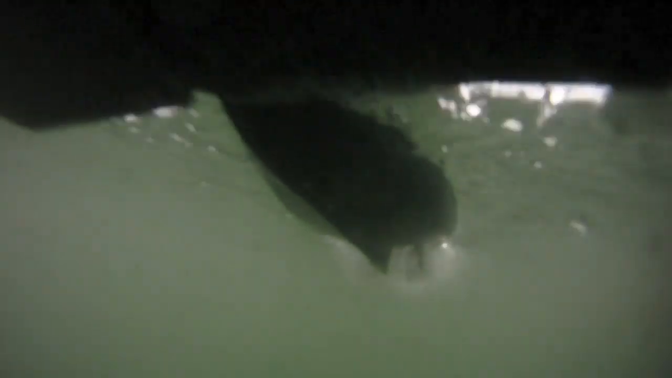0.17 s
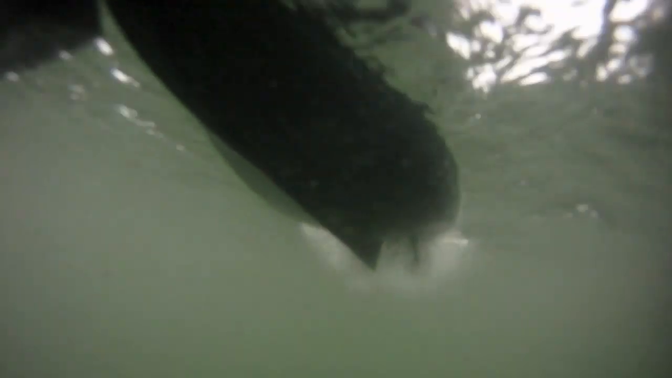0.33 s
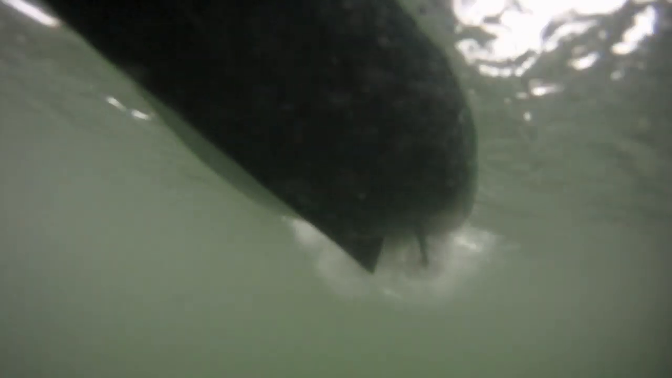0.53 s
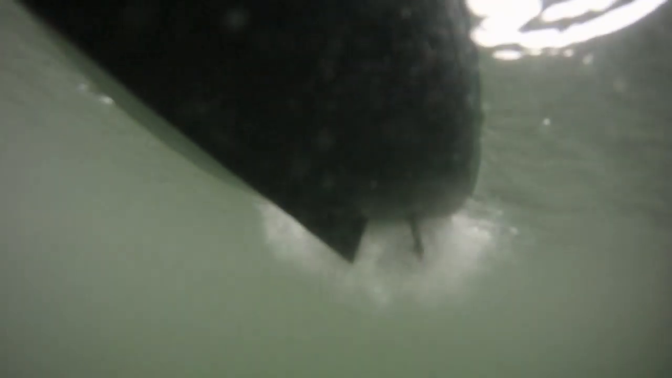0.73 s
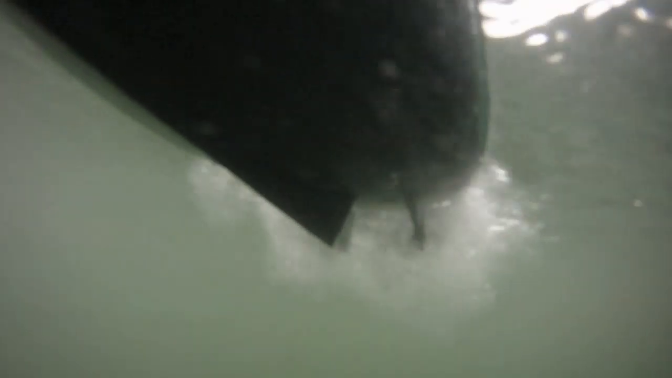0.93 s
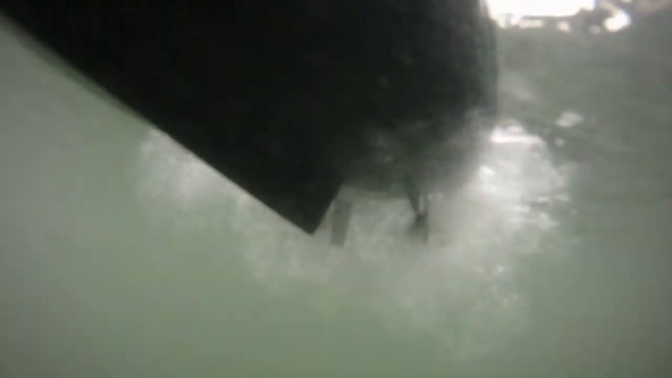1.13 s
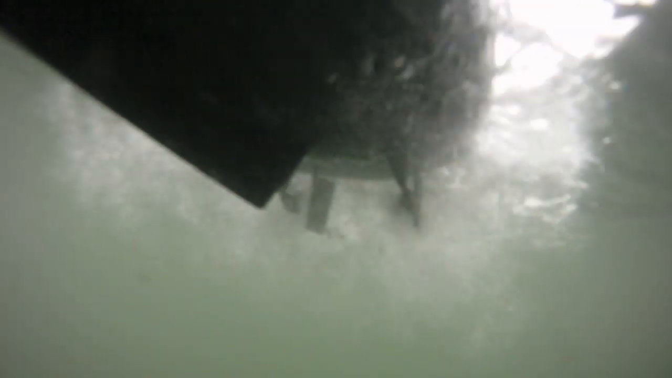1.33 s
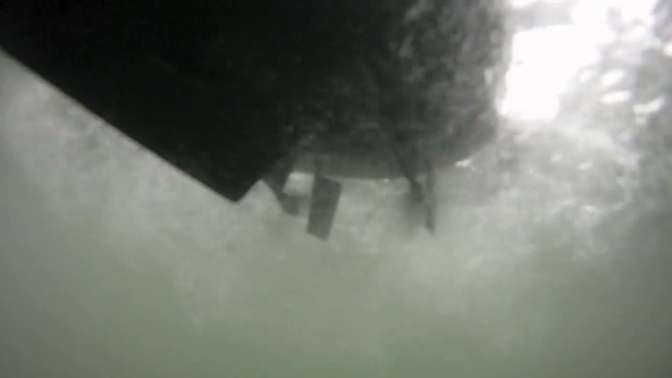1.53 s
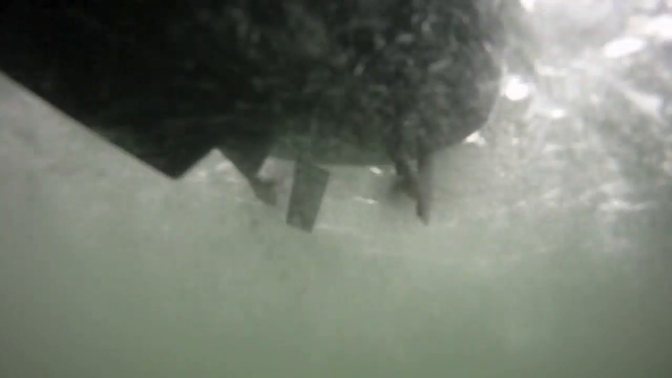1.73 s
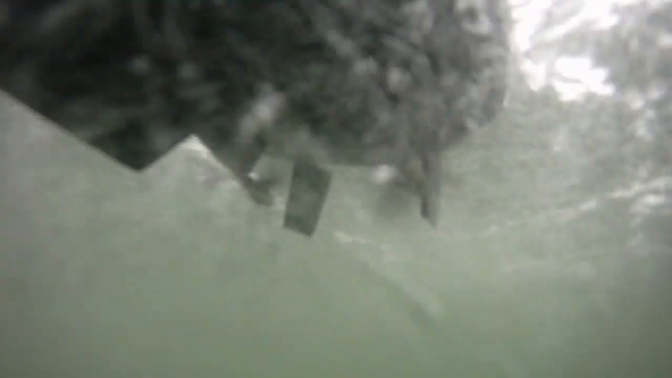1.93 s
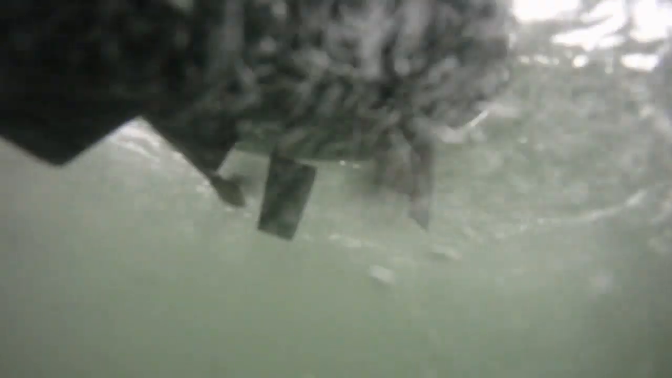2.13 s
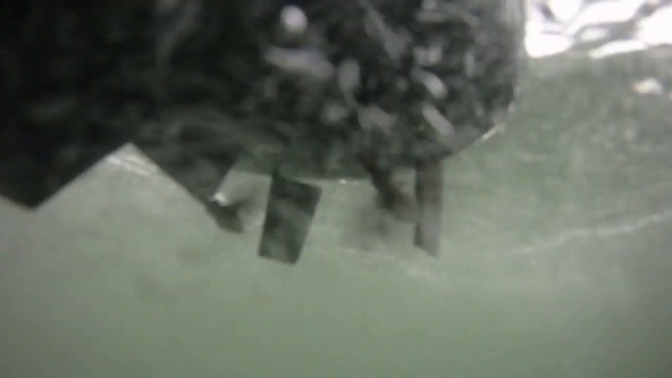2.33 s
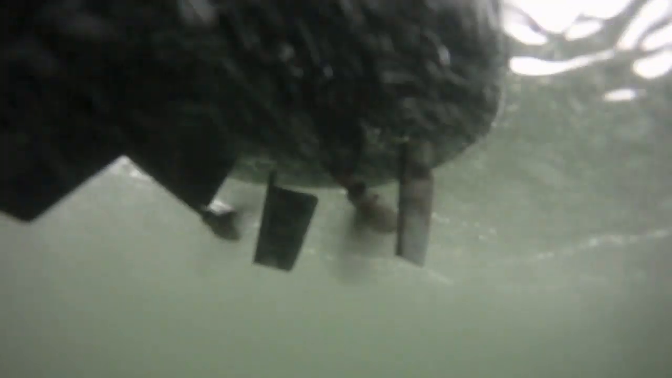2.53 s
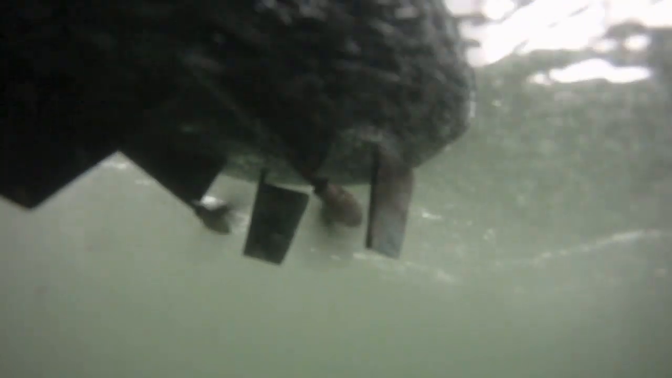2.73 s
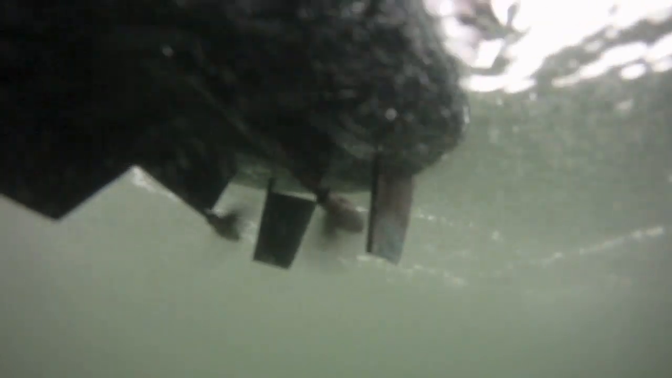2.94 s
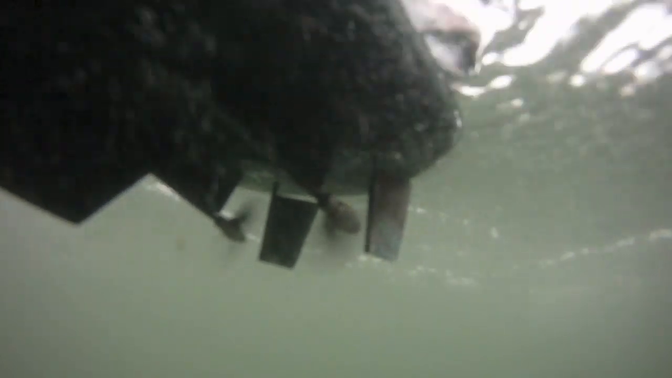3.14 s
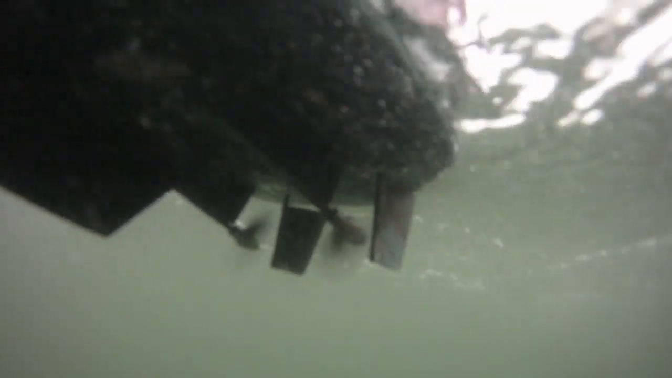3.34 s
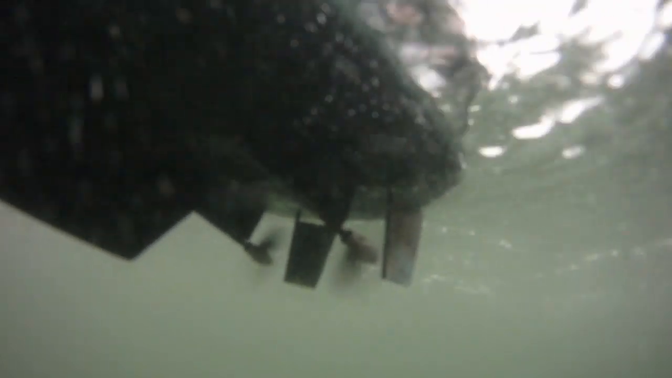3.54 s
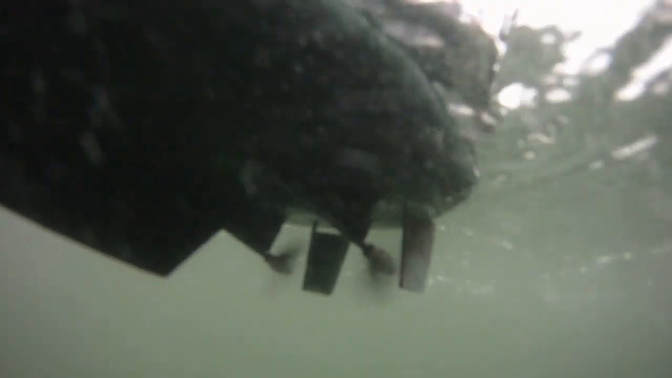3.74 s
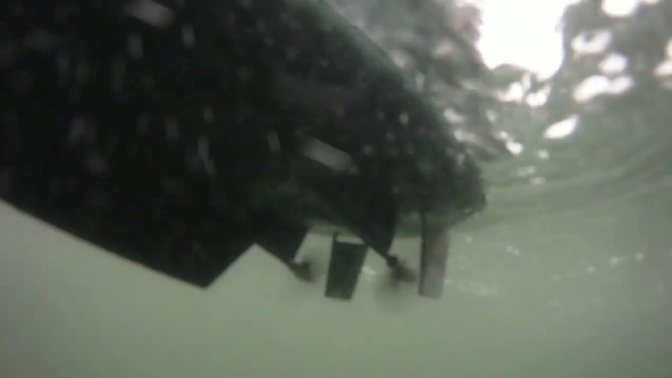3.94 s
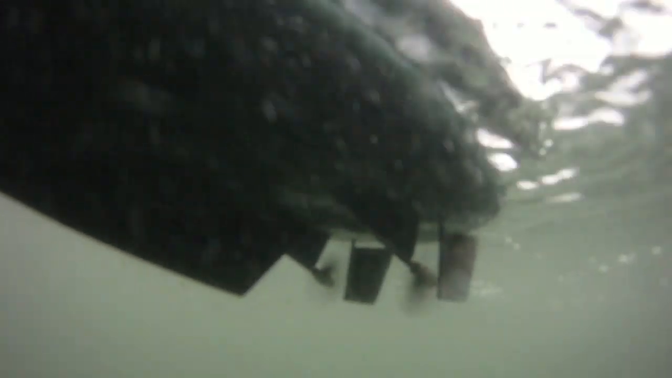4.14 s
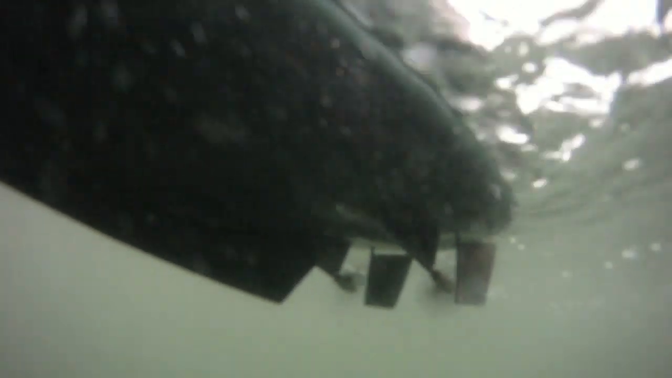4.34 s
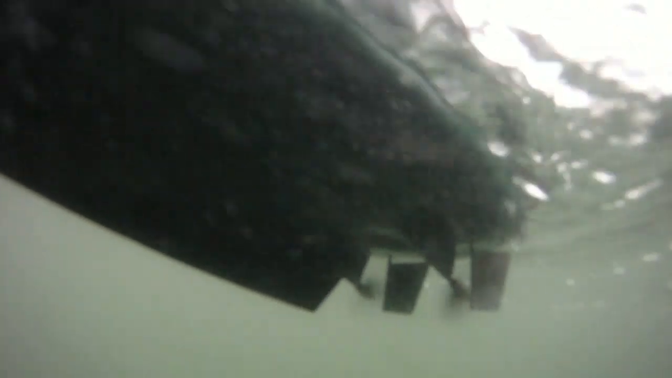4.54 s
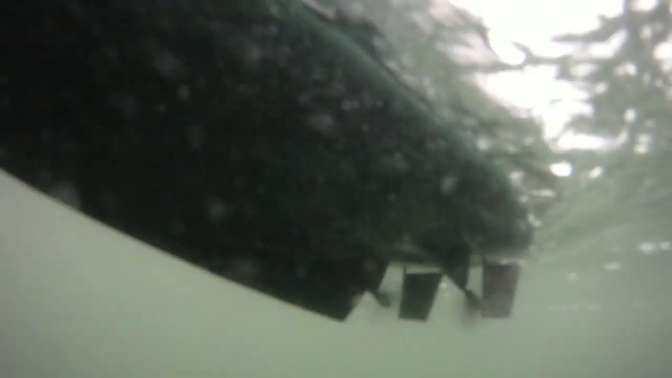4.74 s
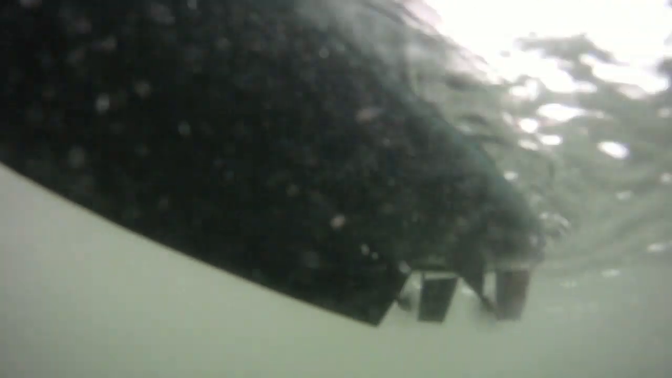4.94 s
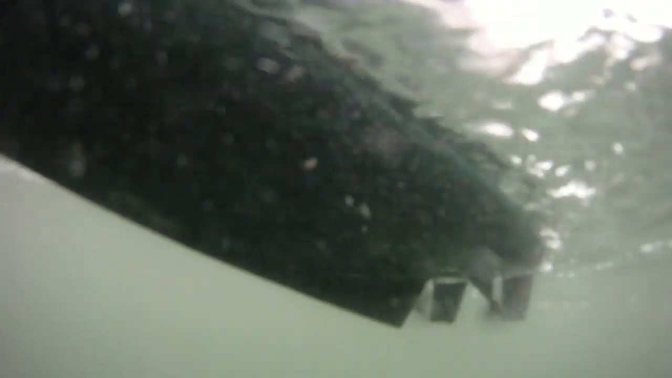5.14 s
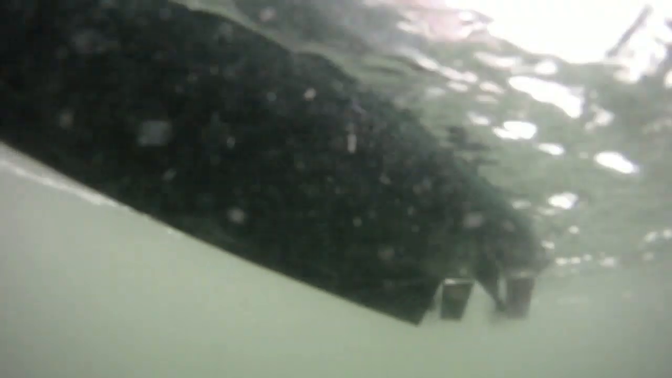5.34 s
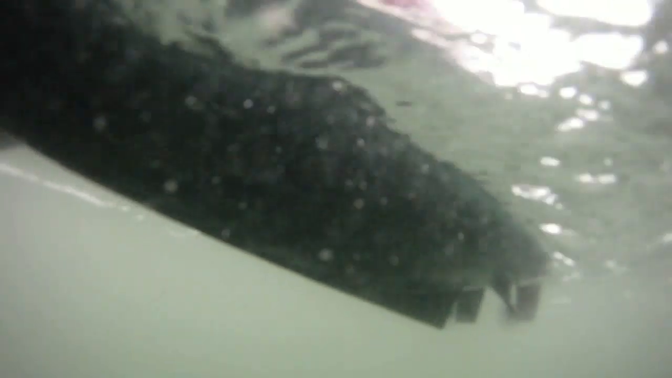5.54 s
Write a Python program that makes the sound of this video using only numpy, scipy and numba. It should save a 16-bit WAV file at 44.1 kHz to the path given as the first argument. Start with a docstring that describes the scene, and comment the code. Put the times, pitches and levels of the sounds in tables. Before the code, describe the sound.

Heard through a cheap submerged camera, a model boat's two propeller shafts purr at about twenty-eight pulses a second. A low hull throb grows first, then a raspy metallic chatter around two kilohertz surges as the stern passes, with tiny chirps, gear whine, bubbling foam and fizzing spray. It drops away quickly, leaving fluttering thump, faint whine and soft churning water.

```python
"""Under water, by a submerged camera: a twin-screw model boat runs past, comes close and draws away.
The port shaft thumps the hull and its gear whines once a turn. The starboard shaft, at a slightly different
speed, rubs and taps, once a turn at first and then twice, and chirps at each hard catch.
Shaped noise and ringing clicks make the churn, bubbles, foam and spray; a motor whine and hull hum lie beneath.
The camera's coarse sampling mirrors it all into a metallic treble."""
import sys
import numpy as np
from scipy import signal
from scipy.fft import rfft, irfft
from scipy.io import wavfile
from numba import njit

SR = 44100
rng = np.random.default_rng(int(sys.argv[2]) if len(sys.argv) > 2 else 0)


def store_wav(level_fs):
    """Save 16-bit WAV to argv[1]."""
    pcm = np.round(np.clip(np.atleast_2d(level_fs), -1, 1) * 32767)
    wavfile.write(sys.argv[1], SR, pcm.T.astype(np.int16))


N = 250488
TIME = np.arange(N) / SR  # seconds

# In every swell or rise below, the half width is the time from the peak down to 1/e.
# The pass of the stern. Each row: time in seconds, loudness of the shafts in dB (only its swing is used).
PASS = [(0.0, -48.5), (0.4, -37.5), (0.55, -38.5), (0.75, -31.5), (1.28, -27), (1.45, -19), (1.75, -10),
        (2.55, -10.5), (2.85, -19), (3.75, -35), (4.5, -36), (5.05, -43), (5.68, -45.5)]
# Shaft speeds. Each row: time in seconds, port turns per second, starboard turns per second.
SHAFTS = [(0.0, 28.32, 28.44), (0.6, 28.47, 28.36), (1.0, 27.91, 27.79), (1.4, 27.69, 28.25),
          (1.8, 27.07, 28.17), (2.3, 26.62, 28.12), (2.8, 26.87, 28.13), (3.3, 26.93, 27.9),
          (3.8, 26.97, 28.18), (4.3, 27.11, 28.18), (4.8, 26.69, 27.85), (5.68, 26.96, 28.13)]
# Sharp modes of the shaft tube. Each row: pitch in Hz, width in Hz, level in dB against the rubbing when closest.
TUBE = [(2180, 9.6, -2.5), (2304, 12, -8)]
# Hard catches of the starboard shaft. Each row: time in seconds, peak in dB, pitch in Hz.
CHIRPS = [(1.422, -15.5, 2220), (1.475, -11, 2150), (1.667, -7, 2200), (1.723, -8, 2200), (1.776, -9, 2340),
          (1.812, -5, 2360), (1.903, -8, 2350), (1.937, -4, 2360), (1.968, -5.5, 2320), (2.057, -5.5, 2170),
          (2.094, -9.5, 2220), (2.254, -7, 2290), (2.343, -7, 2200), (2.378, -7.5, 2320), (2.467, -7, 2160),
          (2.649, -12, 2200)]
# The gear's third and fourth partials, which come with load: relative levels in dB.
OVERTONES_DB = [-1.5, -16.5]
# Spells of load on the gear teeth. Each row: start in seconds, end in seconds, rise of the overtones in dB.
LOAD_SPELLS = [(0.353, 1.148, 7), (2.005, 3.312, 11), (2.334, 2.406, 5.5), (2.588, 2.662, 8)]
# The gear swells as the stern swings. Each row: time in seconds, half width in seconds, rise in dB.
GEAR_RISES = [(1.75, 0.076, 3), (5.64, 0.054, 7.5)]
# The port shaft's thump. Each row: time in seconds, level in dB before the trim in scene().
THUMP = [(0.0, -26), (0.2, -57), (0.5, -51), (0.75, -32.5), (1.2, -21.5), (1.77, -24.5), (1.98, -33),
         (2.3, -32.5), (4.9, -28.5), (5.68, -40.5)]
# Hull modes under the thump. Each row: pitch in Hz, width in Hz, relative level in dB.
HULL = [(137.6, 29, -14.5), (157, 34, -6), (214.4, 29, 0.5), (278, 33, -13)]
# The deepest hull mode stands out as the hull slides by: time in seconds, half width in seconds, added gain in dB.
DEEP_SWELL = (1.15, 0.57, 3.3)
# Propeller wake. Each row: time in seconds, churn in dB, foam in dB, both before the trims of each layer.
WAKE = [(0.0, -34, -51.5), (1.0, -31.0, -41.5), (1.7, -24, -28.5), (2.0, -29, -30), (2.25, -26.5, -26),
        (2.6, -25, -30.5), (3.15, -30, -33.5), (4.3, -31.5, -40.5), (4.85, -32.5, -45),
        (5.25, -39.5, -49.5), (5.68, -40.5, -41)]
# Noise colours of the wake and the flow. Each row: frequency in Hz, relative level in dB.
CHURN = [(130, -67), (240, 2), (300, 0), (390, -1.5), (490, 2.5), (580, -5), (660, -4), (820, -11),
         (1100, -6.5), (1600, -20)]
FOAM = [(800, -55), (1200, 13), (1480, -2), (1750, 7), (2150, 6.5), (2600, -5), (3000, -5), (3600, -11.5),
        (4500, -46)]
SPRAY = [(2300, 5), (3100, 0), (3700, 8), (4100, 0), (4500, 6.5), (5000, -4.5), (5400, -3.5), (5900, -14)]
RUMBLE = [(12, -5), (27, -1.5), (42, -2.5), (62, -3), (82, -1.5), (100, -12.5), (130, -14), (200, -25)]
# Gushes of air. Each row: time in seconds, half width in seconds, level in dB.
GUSHES = [(.27, .11, -41), (1.54, .08, -33), (1.84, .08, -28.5)]
# The motor is heard best from astern: time in seconds, half width in seconds, level in dB.
WHINE_SWELL = (3.08, 1.68, -38)
# The hull rings in swells. Each row: time in seconds, half width in seconds, level in dB.
RING_SWELLS = [(1.4, 0.83, -39), (4.87, 0.41, -39)]
# Tones of the hull's hum. Each row: pitch in Hz, level in dB before the swells.
HUM = [(139, -41.5), (172, -35), (199, -35), (334, -37), (398, -46)]
# The hull hums in swells. Each row: time in seconds, half width in seconds, gain in dB on the tones.
HUM_SWELLS = [(.12, 0.34, 1.5), (.87, 0.28, 0.5), (5.6, 0.54, -12.5)]
# A bubble cloud sweeps over the camera and muffles gear and rumble: time and half width in seconds.
CLOUD_S, CLOUD_WIDTH_S = 1.986, 0.16


def from_db(db):
    """Decibels to gain."""
    return 10 ** (np.asarray(db) / 20)


def rms_one(x):
    """Scale to rms 1."""
    return x / np.sqrt(np.mean(x ** 2) + 1e-20)


def in_time(rows):
    """Draw each column of a curve table at every sample."""
    seconds, *columns = np.transpose(rows)
    return [np.interp(TIME, seconds, column) for column in columns]


def swell(at_s, width_s):
    """A smooth rise and fall of height 1."""
    return np.exp(-((TIME - at_s) / width_s) ** 2)


def swells(rows):
    """Summed gain of a series of swells."""
    return sum(from_db(db) * swell(s, width_s) for s, width_s, db in rows)


def drift(rate_hz):
    """Slow chance of rms 1: noise that falls away steeply above the rate."""
    hz = np.fft.rfftfreq(N, 1 / SR)
    return rms_one(irfft(rfft(rng.standard_normal(N)) / (1 + (hz / rate_hz) ** 4), N))


def coloured(x, spectrum):
    """Give a signal the colour of a spectrum, falling steeply outside it; rms 1."""
    hz = np.fft.rfftfreq(N, 1 / SR) + 1  # 1 Hz up, to keep the logarithm finite
    points, db = np.transpose(spectrum)
    edges = np.minimum(1, np.minimum(hz / points[0], points[-1] / hz)) ** 4
    colour = from_db(np.interp(np.log(hz), np.log(points), db))
    return rms_one(irfft(rfft(x) * edges * colour, N))


@njit
def two_pole(x, angle, r):
    """Resonator whose centre may move; gain 1 on top."""
    y = np.zeros(len(x))
    for i in range(2, len(x)):
        drive_in = (1 - r * r) / 2 * (x[i] - x[i - 2])
        y[i] = drive_in + 2 * r * np.cos(angle[i]) * y[i - 1] - r * r * y[i - 2]
    return y


def resonate(x, hz, width_hz):
    """Pass a signal through one resonance, whose width sets how fast it dies."""
    angle = 2 * np.pi * hz / SR * np.ones(N)
    kept_alive = x + 1e-18 * np.cos(TIME)  # inaudible offset keeps the arithmetic fast in silence
    return two_pole(kept_alive, angle, np.exp(-np.pi * width_hz / SR))


def lobe(turns, depth_db):
    """Pressure that peaks at every whole turn and is lower by the depth half a turn away."""
    return from_db(depth_db * (np.cos(2 * np.pi * turns) - 1) / 2)


def grains(per_s, spread_db):
    """Random clicks of uneven size and either sign."""
    struck = rng.random(N) < per_s / SR
    size = from_db(spread_db * np.minimum(rng.exponential(1, N), 4))
    return struck * size * rng.choice([-1, 1], N)


def friction(turns, worn_share):
    """Rough contact: the same uneven surface comes round every turn, along with fresh noise."""
    points = 1600  # per turn
    surface = irfft(np.exp(2j * np.pi * rng.random(points // 2 + 1)), points)
    worn = rms_one(surface[(turns * points).astype(int) % points])
    return np.sqrt(worn_share) * worn + np.sqrt(1 - worn_share) * rng.standard_normal(N)


def taps(turns, hz):
    """Short contacts every whole turn, later every half turn, each a clean burst at the chatter's pitch."""
    burst_s, uneven_db, spread_hz = 0.0036, 2.2, 60  # burst_s is the half width
    slip_rad, double_from_s, single_tap_db = 0.074 * 2 * np.pi, 1.1, 3
    index = np.round(2 * turns).astype(int) + 2
    strength, detune, slip = rng.standard_normal((index.max() + 1, 3))[index].T
    t = (turns - np.round(2 * turns) / 2) / np.gradient(turns, TIME)  # seconds from the nearest tap
    # single taps use every other contact and stand out more
    touches = np.where(TIME > double_from_s, 1, index % 2 * from_db(single_tap_db))
    tone = np.cos(2 * np.pi * (hz + spread_hz * detune) * t + slip_rad * slip)
    burst = np.exp(-(t / burst_s) ** 2) * tone
    return rms_one(touches * from_db(uneven_db * np.clip(strength, -2, 1)) * burst)


def chatter(turns, near_db, at_turn, width_hz):
    """The shaft rubs all the time, taps and rings its tube; it sticks for a moment at each hard catch."""
    hz = 2231 + 3 * near_db + 34.3 * drift(13.0)  # tends higher when close, and wanders
    rubbing = friction(turns, worn_share=0.38)
    broad = rms_one(resonate(resonate(rubbing, hz, width_hz), hz, width_hz))
    sharp = sum(from_db(db) * rms_one(resonate(broad, mode_hz, width)) for mode_hz, width, db in TUBE)
    # the tube's long ring fades faster with distance than the rubbing
    rub = broad * from_db(-0.5) + sharp * from_db(0.19 * near_db)
    stuck = sum(swell(s - 0.003, 0.0073) for s, _, _ in CHIRPS)
    contact = rms_one(rub + from_db(0.5) * taps(turns - at_turn, hz))
    return contact * from_db(-15 * stuck)


def chirps(length_s):
    """Hard catches: tones that swell and die within a few milliseconds."""
    out = np.zeros(N)
    for s, db, hz in CHIRPS:
        near = slice(int((s - 10 * length_s) * SR), int((s + 10 * length_s) * SR))
        t = TIME[near] - s
        tone = np.cos(2 * np.pi * (hz * t + rng.random()))
        out[near] += from_db(db) * np.exp(-(t / length_s) ** 2) * tone
    return out


def gear(turns, at_turn, depth_db, looseness):
    """A gear runs off centre, so its whine swells once a turn; play in the teeth blurs the pitch."""
    octave_db, rest_db, onset_s = -11.5, -21.5, 0.023  # rest: overtones with no load
    mesh = 2 * np.pi * 47 * turns  # 47 tooth contacts a turn
    phase = mesh + looseness * drift(44) + 0.45 * drift(4.7)
    octave = from_db(octave_db + 4.4 * drift(43)) * np.cos(2 * phase + drift(116))
    overtones = sum(from_db(db + 3.4 * drift(98)) * np.cos(k * phase + drift(210))
                    for k, db in enumerate(OVERTONES_DB, 3))
    load_db = 0
    for start, end, db in LOAD_SPELLS:
        inside_s = np.minimum(TIME - start, end - TIME)
        load_db = load_db + db * np.clip(inside_s / onset_s + 0.5, 0, 1)
    pressure = lobe(turns - at_turn, depth_db) * from_db(1.4 * drift(55))
    return rms_one(pressure * (np.cos(phase) + octave + from_db(rest_db + load_db) * overtones))


def thump(turns, at_turn, uneven_db, rough):
    """An unbalanced shaft knocks the hull's modes once a turn and shakes them in between."""
    knocks = np.diff(np.floor(turns - at_turn), prepend=np.floor(-at_turn))
    knocks = knocks * from_db(uneven_db * drift(28))
    force = rms_one(knocks) + rough * rng.standard_normal(N)
    modes = [(-1) ** k * from_db(db) * resonate(force, hz, width)  # neighbours in opposite sign
             for k, (hz, width, db) in enumerate(HULL)]
    body = sum(modes) + swells([DEEP_SWELL]) * modes[0]
    band = signal.butter(2, [140, 380], "band", fs=SR, output="sos")
    return rms_one(signal.sosfilt(band, body) * lobe(turns - at_turn - 0.1, depth_db=-2.5))


def bubbles(per_s, cycles):
    """Bubbles of many sizes, each starting softly and ringing for a few cycles."""
    clicks = grains(per_s, spread_db=5.5)
    pitches = np.geomspace(280, 950, 14)  # Hz
    dealt = rng.integers(0, len(pitches), N)
    rings = sum(resonate(clicks * (dealt == k), hz, hz / cycles) for k, hz in enumerate(pitches))
    return rms_one(signal.sosfilt(signal.butter(2, 1300, fs=SR, output="sos"), rings))


def churn(turns, churn_db):
    """Churned water pulses twice a turn with the blades, among ringing bubbles."""
    blades = lobe(2 * (turns - 0.28), depth_db=8.5)
    swirl = coloured(friction(turns, worn_share=0.35) * blades * from_db(drift(30)), CHURN)
    return from_db(churn_db) * (from_db(-2.5) * swirl + from_db(-11.5) * bubbles(per_s=400, cycles=8.5))


def gurgle(churn_db):
    """Air gurgles through one broad resonance, steadily below the churn and in gushes."""
    air = rms_one(resonate(resonate(rng.standard_normal(N), 1074, 340), 1074, 340))
    return (from_db(churn_db - 11) + swells(GUSHES)) * air


def foam(foam_db):
    """Foam fizzes: noise and uneven clicks that flicker in level."""
    fizz = rng.standard_normal(N) + 0.54 * rms_one(grains(1500, spread_db=8.5))
    return from_db(foam_db + 1.5) * coloured(fizz * from_db(2.36 * drift(38)), FOAM)


def spray(turns, foam_db):
    """Fine spray bursts once a turn, trails the foam and surges once as the propellers' jet goes by."""
    lag_s, below_foam_db, surge_db = 0.58, -12.5, 13
    spray_db = below_foam_db + np.interp(TIME - lag_s, TIME, foam_db) + surge_db * swell(2.48, 0.14)
    fizz = rng.standard_normal(N) + 0.6 * rms_one(grains(900, spread_db=3.5))
    bursts = fizz * lobe(turns - 0.47, depth_db=5) * from_db(2 * drift(60))
    return from_db(spray_db) * coloured(bursts, SPRAY)


def drive(turns):
    """The motor whines at forty times the shaft speed; the hull hums and rings on fixed tones."""
    whine = rms_one(np.sin(2 * np.pi * 40 * turns + 0.3 * drift(10)))
    whine = swells([WHINE_SWELL]) * from_db(1.7 * drift(2.3)) * whine
    ring = np.sin(2 * np.pi * 940 * TIME + 0.5 * drift(26)) * lobe(turns - 0.3, depth_db=6)
    ring = swells(RING_SWELLS) * from_db(3.1 * drift(23)) * rms_one(ring)
    hum = 0
    for hz, db in HUM:
        tone = np.sqrt(2) * np.sin(2 * np.pi * hz * TIME + 1.28 * drift(7.8))
        hum = hum + from_db(db + 1.04 * drift(27)) * tone
    return whine + ring + swells(HUM_SWELLS) * hum


def rumble():
    """Water flowing round the camera: low noise that calms as time goes on and dips under the cloud."""
    start_db, db_per_s, cloud_db = -42.5, -1.37, -8
    rumble_db = start_db + db_per_s * TIME + cloud_db * swell(CLOUD_S, CLOUD_WIDTH_S)
    return from_db(rumble_db) * coloured(rng.standard_normal(N), RUMBLE)


def scene():
    """Both shafts, the wake, the drive and the flow, heard through the water."""
    port, starboard = [np.cumsum(speed) / SR for speed in in_time(SHAFTS)]  # turns so far
    churn_db, foam_db = in_time(WAKE)
    thump_db, = in_time(THUMP)
    pass_db, = in_time(PASS)
    near_db = pass_db - pass_db.max()  # 0 at the closest point
    # each shaft sound follows its own share of the pass's swing
    chatter_db = -17.5 + 0.87 * near_db
    gear_db = -23.5 + 0.67 * near_db - 5.5 * swell(CLOUD_S, CLOUD_WIDTH_S)
    gear_db += sum(db * swell(s, width_s) for s, width_s, db in GEAR_RISES)

    out = from_db(chatter_db) * chatter(starboard, near_db, at_turn=0.06077, width_hz=480)
    out += chirps(length_s=0.004)
    out += from_db(gear_db) * gear(port, at_turn=0.37, depth_db=17.5, looseness=0.69)
    out += from_db(thump_db - 4.5) * thump(port, at_turn=0.5303, uneven_db=-0.05, rough=0.55)
    out += churn(starboard, churn_db) + gurgle(churn_db)
    out += foam(foam_db) + spray(starboard, foam_db)
    out += drive(starboard) + rumble()
    return out[None]


def record(dry):
    """The camera adds faint hiss; each coarse sample is held four times, which mirrors sound into the treble."""
    sampling_hz, cutoff_hz, hiss_db = 12000, 15100, -65
    hissing = dry + from_db(hiss_db) * rng.standard_normal(N)
    smooth = signal.sosfilt(signal.butter(8, 5750, fs=SR, output="sos"), hissing)
    coarse = signal.resample(smooth, round(N * sampling_hz / SR), axis=-1)
    held = signal.resample(np.repeat(coarse, 4, axis=-1), N, axis=-1)
    return signal.sosfilt(signal.ellip(10, 0.1, 90, cutoff_hz, fs=SR, output="sos"), held)


dry = scene()
out = record(dry)
store_wav(out)
```